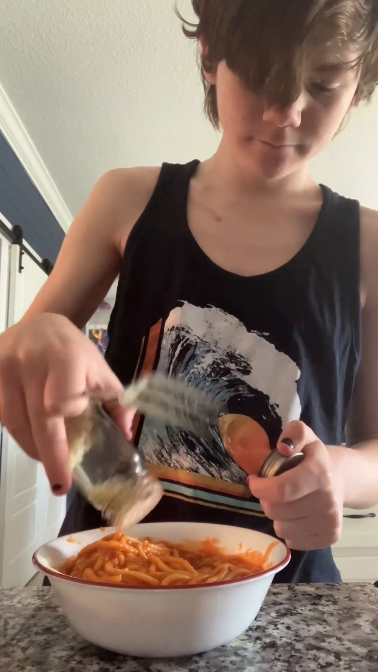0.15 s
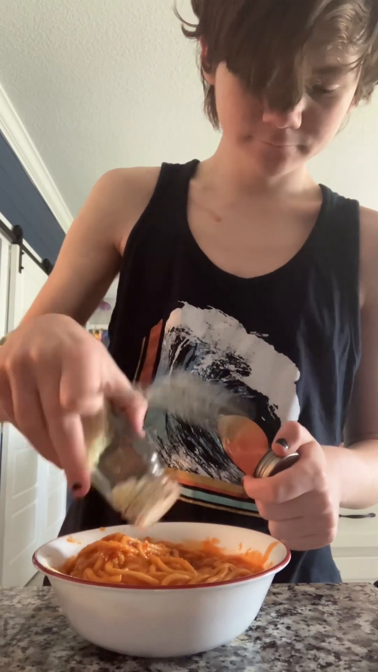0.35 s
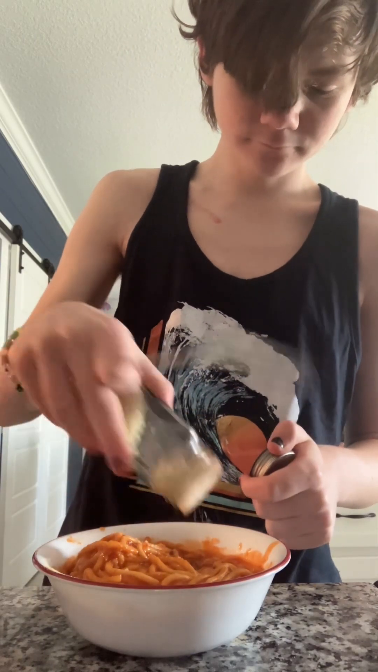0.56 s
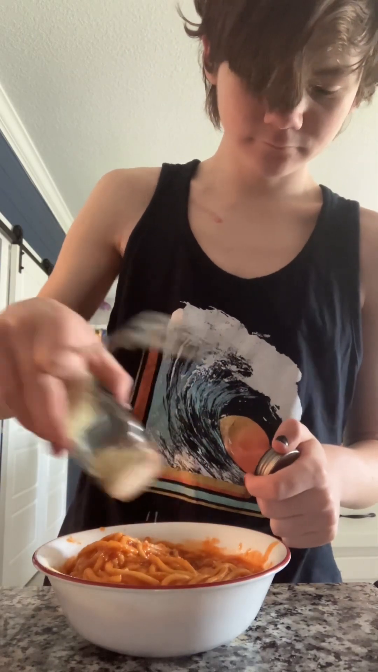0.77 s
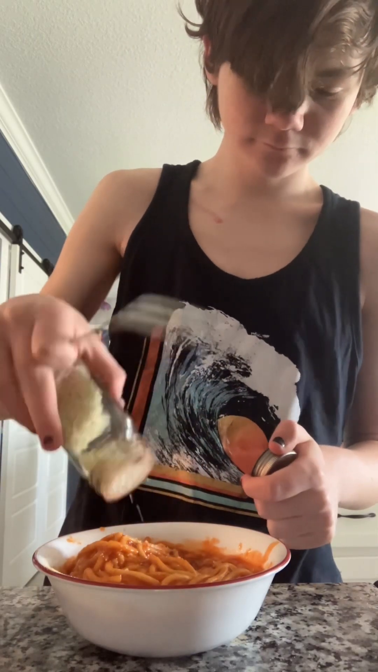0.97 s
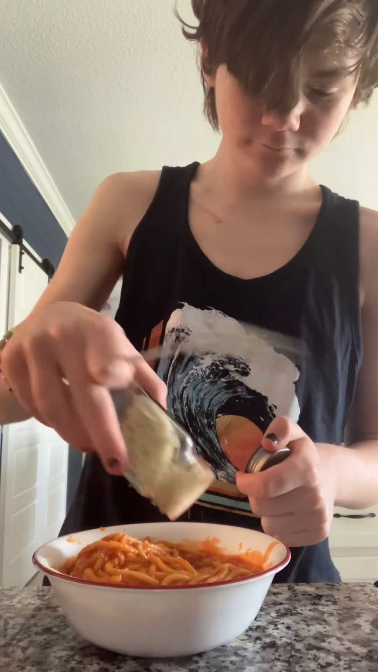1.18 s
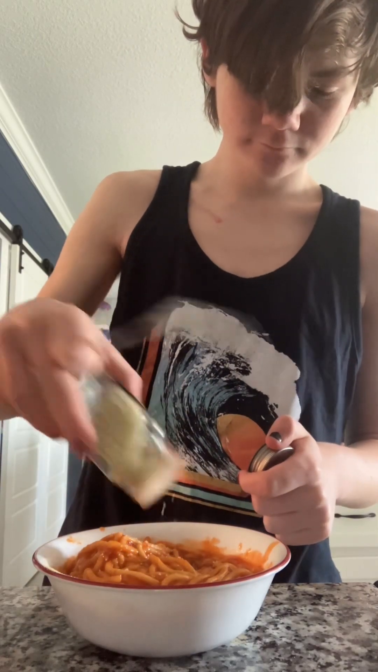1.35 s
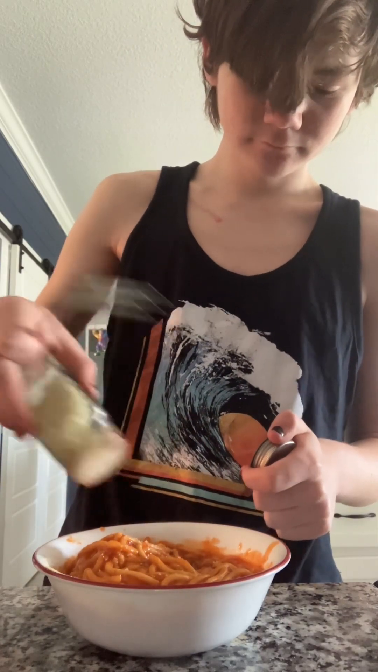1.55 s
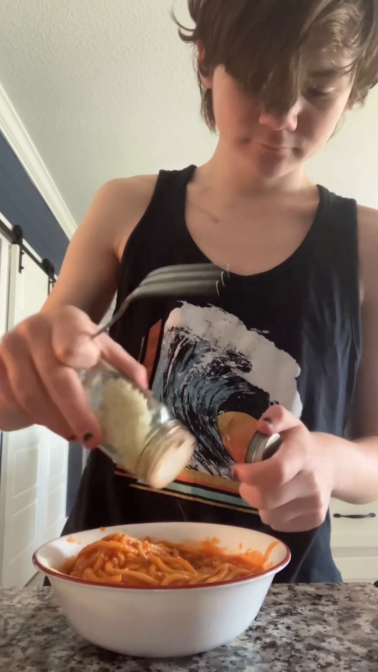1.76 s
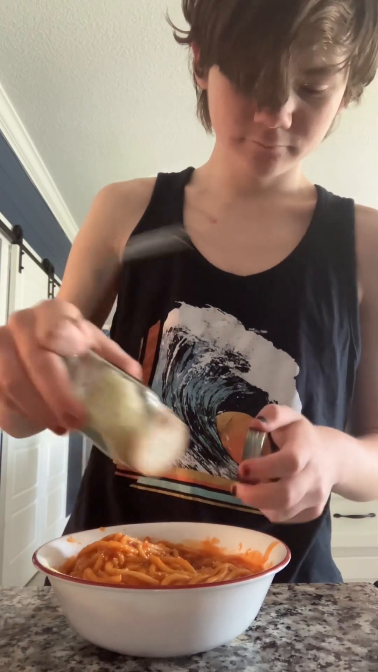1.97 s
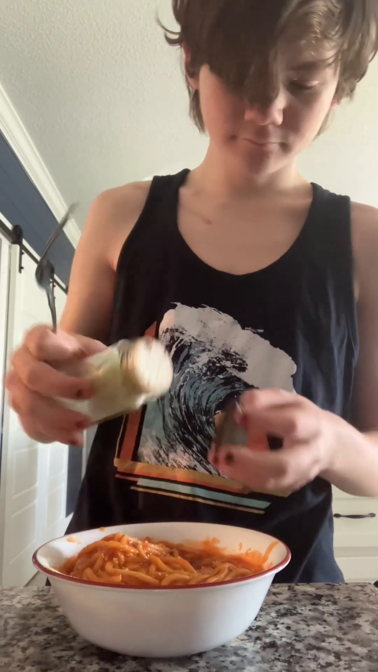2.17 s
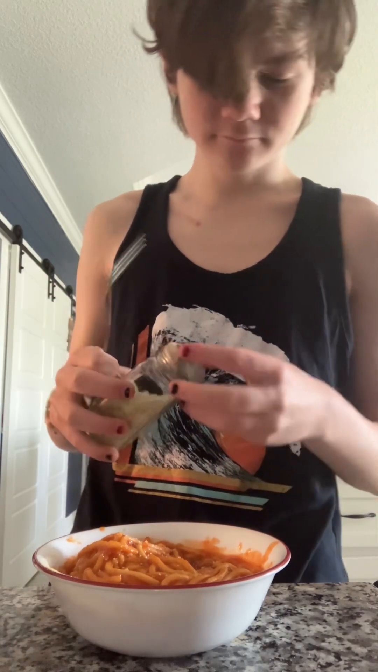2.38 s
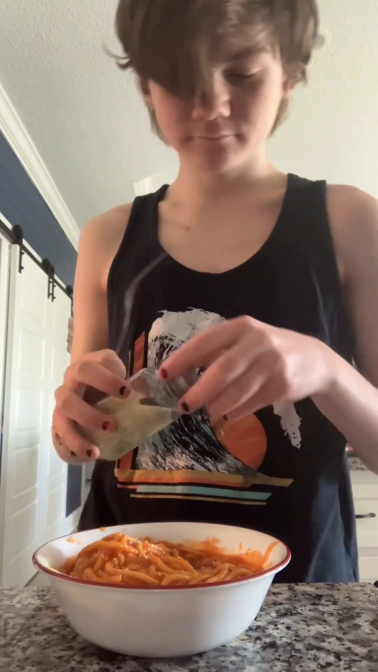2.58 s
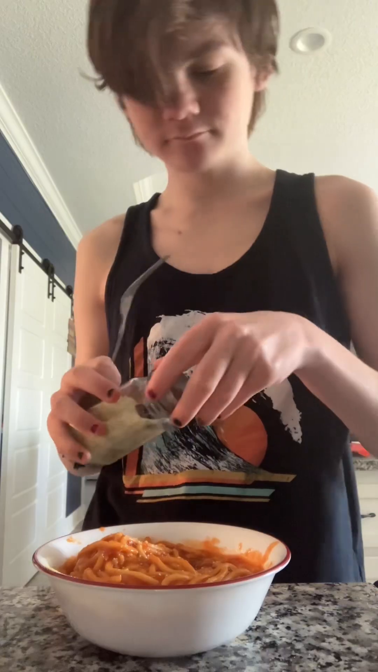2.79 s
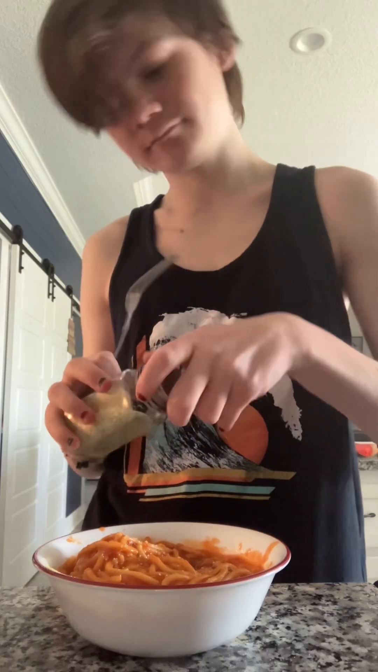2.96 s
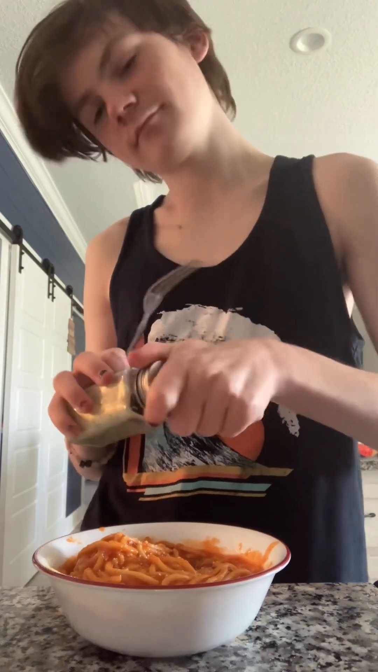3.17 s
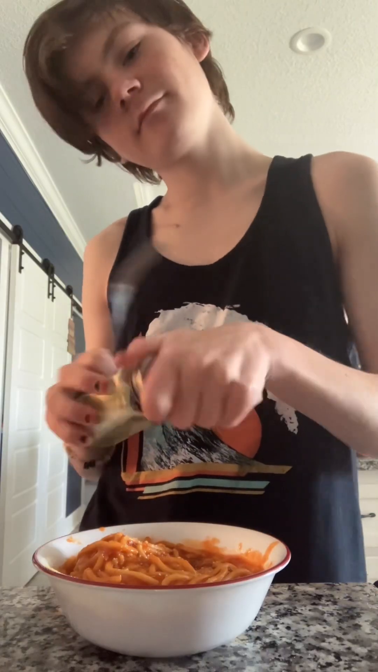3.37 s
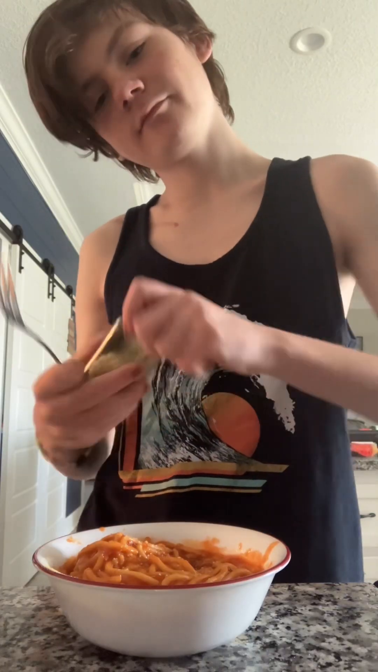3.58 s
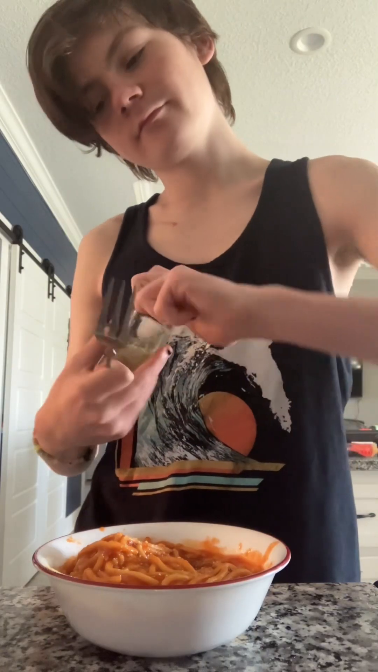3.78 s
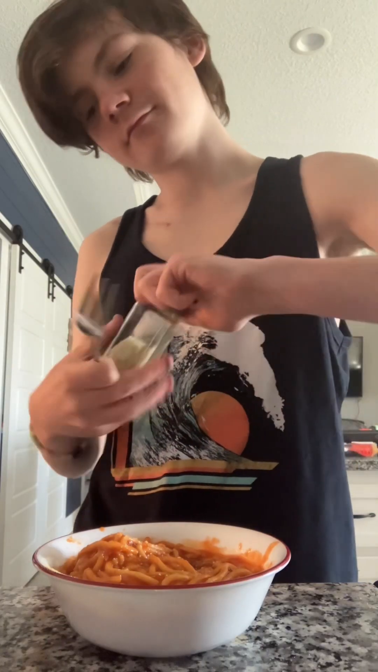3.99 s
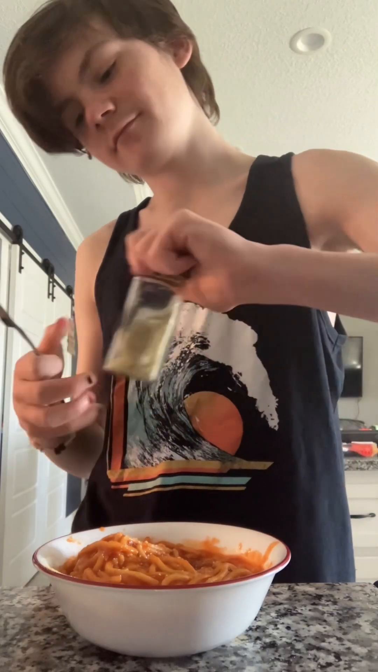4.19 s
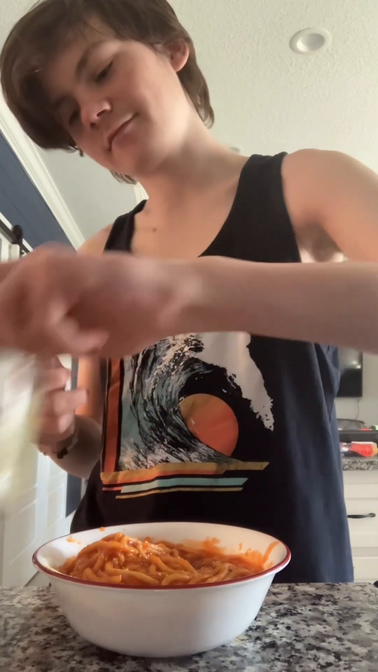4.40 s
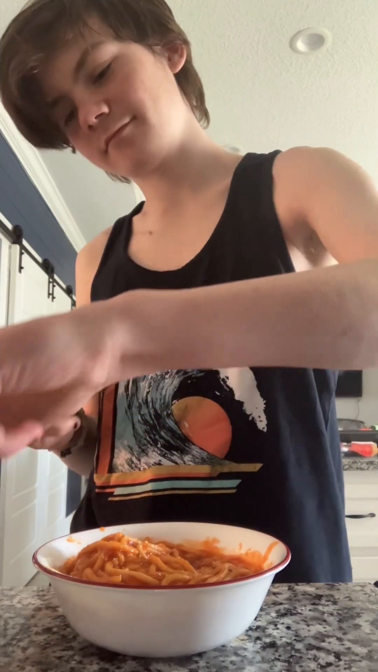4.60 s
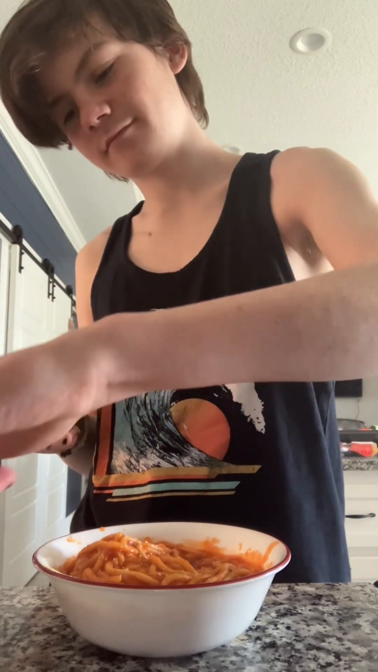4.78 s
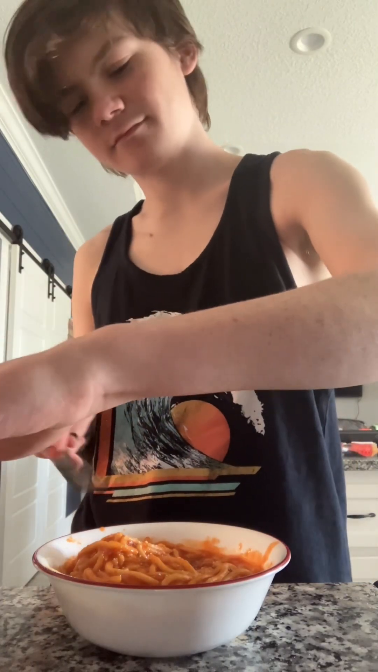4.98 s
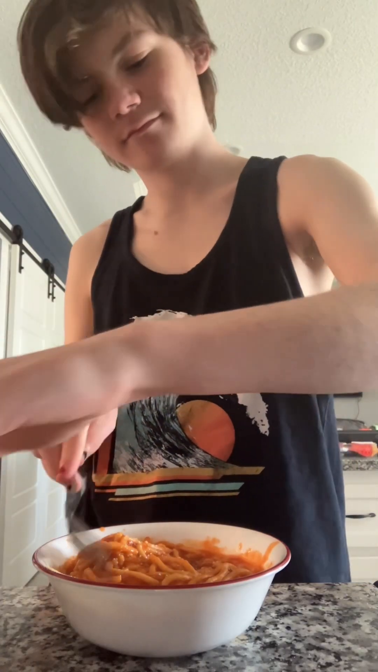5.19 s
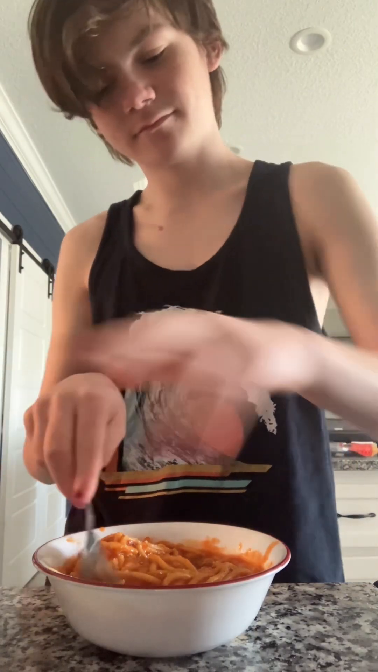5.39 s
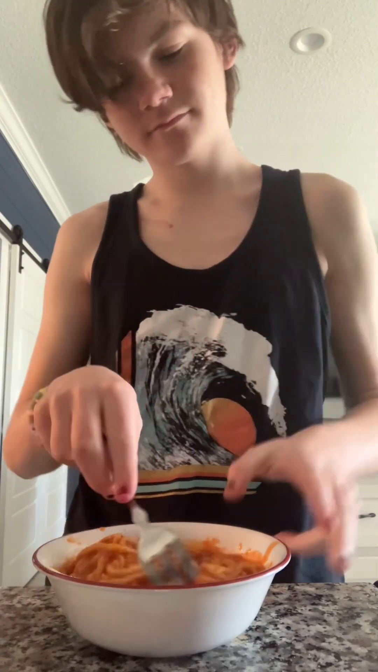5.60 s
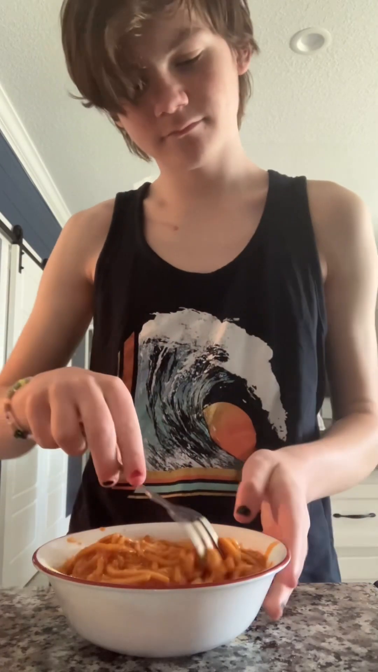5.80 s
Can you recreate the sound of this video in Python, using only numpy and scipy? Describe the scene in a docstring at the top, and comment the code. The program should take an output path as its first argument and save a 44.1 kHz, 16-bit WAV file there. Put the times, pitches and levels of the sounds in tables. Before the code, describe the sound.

Quick gritty shaker swishes and glassy clinks give way to a capping clatter, rasping twist, set-down knock, and faint fork tap in a bowl.

```python
"""Dry grains, shaken by hand in a glass jar over a bowl, are dense random impacts that also ring the glass.
The fork held in the hand clinks on the jar as decaying modes; a metal cap drops on, rocks and is screwed
tight with rasping stick-slip noise. The jar is set on a stone counter to the left, and the fork goes into
the food with a tap on the bowl and wet ticks. Kitchen reverberation, air noise and hum lie under it all."""
import sys
import numpy as np
from scipy import signal
from scipy.fft import rfft, irfft
from scipy.io import wavfile
from scipy.ndimage import uniform_filter1d

SR = 44100
rng = np.random.default_rng(int(sys.argv[2]) if len(sys.argv) > 2 else 0)


def gain_from_db(level_db):
    """Convert decibel levels to linear amplitude factors (20 dB per decade)."""
    decades = np.asarray(level_db, float) / 20
    return 10 ** decades


def unload_wav(signal):
    """Save mono or channel-first audio to the path in sys.argv[1] as 16-bit WAV at rate SR, clipped to [-1, 1]."""
    wavfile.write(
        sys.argv[1],
        SR,
        np.round(np.clip(np.atleast_2d(signal).T, -1, 1) * 32767).astype(np.int16),
    )


N = 257984


def evened(x):
    """Normalisation of power: scales to rms 1."""
    return x / np.sqrt(np.mean(x ** 2) + 1e-20)


def read(points, hz):
    """Interpolation along log frequency, as hearing spaces pitch."""
    f, value = np.transpose(points)
    return np.interp(np.log(hz + 1), np.log(f + 1), value)


def along(points):
    """Amplitude envelope: gain along a curve of (time [s], level [dB]), -120 dB outside it."""
    s, db = np.transpose(points)[:2]
    return gain_from_db(np.interp(np.arange(N) / SR, s, db, -120, -120))


def swell(s, db, rise_ms, fall_ms, shape=1.3):
    """Rise and decay: peaks at db at s, 8.5 dB lower at the times given; a high shape holds, then cuts."""
    ms = 1000 * (np.arange(N) / SR - s)
    return gain_from_db(db - 8.5 * abs(ms / np.where(ms < 0, rise_ms, fall_ms)) ** shape)


def add(mix, s, sound):
    """Superposition: mixes a sound in at time s."""
    part = mix[round(s * SR):][:len(sound)]
    part += sound[:len(part)]


def coloured(x, points):
    """Spectral shaping: multiplies the spectrum of x by a curve, at rms 1."""
    gain = gain_from_db(read(points, np.fft.rfftfreq(len(x), 1 / SR)))
    return evened(irfft(rfft(x) * gain, len(x)))


def resonate(x, hz, width):
    """Resonance by heterodyning: shifts hz (fixed or gliding) to zero, smooths, and shifts back at gain 1."""
    turn = np.exp(2j * np.pi * np.cumsum(hz * np.ones(len(x))) / SR)
    r = np.exp(-np.pi * width / SR)
    return 2 * (turn * signal.lfilter([1 - r], [1, -r], x / turn)).real


def patter(per_s, spread_db):
    """Poisson-like shot noise: impacts of either sign, their sizes exponentially distributed in dB."""
    size = gain_from_db(spread_db * np.minimum(rng.exponential(1, N), 4)) * rng.choice([-1., 1.], N)
    return size * (rng.random(N) < per_s / SR)


def ringing(x, modes, shorter):
    """Modal response by convolution: many small impacts ring modes whose t60 is scaled by shorter."""
    t = np.arange(3000) / SR
    body = sum(gain_from_db(db - 60 * t / (t60 * shorter)) * np.sin(2 * np.pi * hz * t) for hz, db, t60 in modes)
    onset = np.sin(np.pi / 2 * np.minimum(t / 0.0006, 1)) ** 2
    return evened(signal.oaconvolve(x, body * onset)[:N])


def patchy(x, patch_db):
    """Random modulation: patches about 17 ms long and 1.4 kHz wide grow louder or softer."""
    z = signal.stft(x, nperseg=256, noverlap=192)[2]
    patches = uniform_filter1d(rng.standard_normal(z.T.shape), size=12, axis=0)
    patches = uniform_filter1d(patches, size=8, axis=1)
    gusts = uniform_filter1d(rng.standard_normal(z.shape[1]), size=6)  # all bands at once
    field_db = patch_db * (evened(patches).T + 0.25 * evened(gusts))
    return evened(signal.istft(z * gain_from_db(field_db), nperseg=256, noverlap=192)[1][:N])


def blows(rows, modes, spot_db, crack_db, crack_s, rise_s, split, tick_db, slope_db=0):
    """Modal impact: damped modes as beating pairs, weighted by spot_db near the focus, with crack and tick."""
    SPOT_MID_HZ = 5800  # focus frequency at which slope_db per octave adds nothing
    SNAP_DB, SNAP_MS = 4.5, 0.5  # the first instant is louder, while the striker still drives it
    out, t = np.zeros(N), np.arange(9000) / SR
    hz, db, t60 = np.transpose(modes)[:, :, None]
    for s, peak_db, spot_hz, damping in rows:
        focus_db = spot_db + slope_db * np.log2(spot_hz / SPOT_MID_HZ)
        level_db = db + focus_db * np.exp(-(np.log(hz / spot_hz) / .2) ** 2)
        life = t60 * np.clip(1 - damping, .05, 1)
        phase, detune = rng.random((len(hz), 2)).T[:, :, None]
        twin_hz = hz * (1 + split * (detune - .5))
        pair = np.sin(2 * np.pi * (hz * t + phase)) + np.sin(2 * np.pi * (twin_hz * t + phase))
        ring = (gain_from_db(level_db - 60 * t / life) * pair).sum(0)
        # the crack leans to the modes it wakes and fades below the lowest
        colour = np.c_[hz, level_db + 4 * np.log10(life)]
        colour = np.r_[[colour[0] * [.4, 1] - [0, 30]], colour]
        crack = coloured(rng.standard_normal(len(t)), colour)
        ring = ring / abs(ring).max() + gain_from_db(crack_db - 60 * t / crack_s) * crack
        # differencing noise twice makes the tick bright
        ring += gain_from_db(tick_db - 60 * t / 0.038) * np.diff(rng.standard_normal(len(t) + 2), 2)
        ring *= np.sin(np.pi / 2 * np.minimum(t / rise_s, 1)) ** 2
        ring *= gain_from_db(SNAP_DB * np.exp(-1000 * t / SNAP_MS))
        add(out, s, gain_from_db(peak_db) * ring / abs(ring).max())
    return out


# spectrum of the grain impacts: (frequency [Hz], relative density [dB per Hz])
GRAIN_SPECTRUM = [(590, -72.5), (1000, -33), (2140, -19), (3160, -20), (4590, -9), (8970, -3), (10400, 2.5),
                  (11900, -2.5), (15400, 3.5), (15900, -17), (16500, -30.5)]
# modes that sliding grains wake in the loosely held jar: (frequency [Hz], level [dB], t60 before scaling [s])
LOOSE_JAR_MODES = [(4550, -9, .012), (7600, 0, .012), (10500, 2, .004), (13900, 4, .0025)]
# each shake throws the grains at the mouth of the jar, then they slide back:
# (throw time [s], throw level [dB], return time [s], return level [dB])
SHAKES = [(-0.07, -42, 0.014, -44), (0.108, -43.5, 0.186, -44), (0.287, -42, 0.37, -42),
          (0.485, -44, 0.553, -44.5), (0.654, -42.5, 0.73, -44.5), (0.855, -45, 0.936, -41.5),
          (1.043, -41.5, 1.123, -44.5), (1.25, -49.5, 1.319, -48), (1.438, -46.5, 1.511, -46.5),
          (1.627, -44, 1.718, -43.5), (1.829, -44.5, 1.891, -44)]


def grains():
    """Granular impact noise: dense impacts swell with each throw and return; part of them rings the glass."""
    THROW_RISE_MS, THROW_FALL_MS, RETURN_RISE_MS, RETURN_FALL_MS = 23.8, 16.4, 44.4, 30.6
    power = np.zeros(N)
    for throw_s, throw_db, return_s, return_db in SHAKES:
        power += swell(throw_s, throw_db, THROW_RISE_MS, THROW_FALL_MS) ** 2
        power += swell(return_s, return_db, RETURN_RISE_MS, RETURN_FALL_MS, shape=1.24) ** 2
    rain = patter(per_s=5000, spread_db=4.5)
    texture = coloured(rain, GRAIN_SPECTRUM) + gain_from_db(-16) * ringing(rain, LOOSE_JAR_MODES, 0.74)
    return np.sqrt(power) * patchy(texture, patch_db=2.5)


# grains slip along the tilted jar:
# (time [s], level [dB], rise [ms], fall [ms], weight of ringing against 0.5 of sliding [ratio])
TILTS = [(1.985, -55, 23, 100, .6), (2.352, -43.5, 40, 41, 0.44), (4.494, -52, 32.3, 36, 1),
         (4.6, -58.5, 50, 30, 0.17)]


def tilted_grains(glass):
    """Granular flow: sparser grain impacts slide along the jar and mix with its ringing."""
    slide = coloured(patter(per_s=3300, spread_db=5.5), GRAIN_SPECTRUM)
    return sum(swell(*row) * patchy(ring * glass + .5 * slide, patch_db=3.0) for *row, ring in TILTS)


# modes of the glass jar: (frequency [Hz], level [dB], undamped t60 [s])
JAR_MODES = [(1500, -26, .03), (2300, -24, .03), (3880, -5, .025), (4500, -10, .035), (5430, -8, .045),
             (7200, 0, .025), (7680, -6, .06), (8200, -6, .025), (9200, -10, .05), (10300, -9, .03),
             (11600, -9, .03), (12560, -21, .15), (14200, -18, .12), (15200, -4, .008)]
# metal on the glass:
# (time [s], peak level [dB], frequency favoured by the spot struck [Hz], damping by the grip [0-1])
CLINKS = [(0.0458, -32, 5460, 0.95), (0.0538, -24.5, 4000, 0.14), (0.2333, -29.5, 4330, 0),
          (0.269, -36, 8500, 0.6), (0.4191, -22.5, 5050, 0), (0.588, -34, 3880, 0),
          (0.8406, -33, 10500, 0.1), (0.9064, -36.5, 8600, 0.2), (0.9783, -31, 13130, 0.4),
          (1.0425, -35, 11900, 0.5), (1.5535, -19.5, 6700, 0), (1.7636, -17.5, 6570, 0),
          (1.945, -25.5, 9900, 0), (1.9519, -10, 7630, 0.26), (2.2087, -31.5, 4700, 0),
          (2.504, -14, 8500, 0.5), (2.5595, -16.5, 8530, 0.71), (2.7915, -44, 7140, 0.43),
          (3.1557, -15, 9000, 0.67), (3.1679, -13, 4700, 0.7), (3.6161, -9, 13560, 0.28),
          (3.6224, -14, 5540, 0.08), (3.702, -19, 4540, 0), (3.899, -44.5, 11080, 0.7),
          (4.758, -40, 10540, 0.6)]


def clinks():
    """Modal excitation by position: metal on glass favours modes near the spot, higher spots more."""
    return blows(CLINKS, JAR_MODES, spot_db=9, crack_db=-7.5, crack_s=0.012, rise_s=0.0009,
                 tick_db=-18.5, slope_db=6, split=.06)


# modes of the metal cap and the air it shuts in: (frequency [Hz], level [dB], t60 before damping [s])
CAP_MODES = [(1735, -21, 0.026), (3044, -1.5, 0.026), (3666, -13.5, 0.039), (4204, -3.5, 0.024),
             (5674, -12, 0.014), (6130, 5, 0.011), (8127, -4, 0.042), (9000, -9, 0.016),
             (12050, -11.5, 0.037)]
# the cap drops on the rim: (time [s], peak level [dB], favoured frequency [Hz], damping [0-1])
SEATS = [(2.366, -2.5, 4118, 0)]


def cap_drop():
    """Modal impact: the falling metal cap rings as it meets the rim."""
    return blows(SEATS, CAP_MODES, spot_db=3.5, crack_db=-8.0, crack_s=0.017, rise_s=0.0021,
                 split=0.017, tick_db=-18.5)


# the cap rocks: (time [s], peak level [dB], favoured frequency [Hz], damping [0-1])
ROCKS = [(2.532, -36.5, 1735, 0.1), (2.5606, -27.5, 1735, 0), (2.792, -54.5, 1735, 0.3)]


def cap_rocks():
    """Cavity resonance: the rocking cap sounds the air it shuts in, strongly favouring one mode."""
    return blows(ROCKS, CAP_MODES, spot_db=35, crack_db=-17, crack_s=0.063, rise_s=0.0041,
                 split=0.039, tick_db=-42.0)


# the dropped cap chatters on the rim: (time [s], level [dB], rise [ms], fall [ms])
CHATTER = [(2.384, -45.5, 5.7, 129), (2.498, -48.5, 8.35, 45), (3.3, -61.5, 45, 130)]


def cap_chatter(rasp):
    """Repeated contact: random small impacts ring the cap while it rasps on the rim."""
    rattle = ringing(patter(per_s=1200, spread_db=-1.5), CAP_MODES, 0.46)
    return sum(swell(*row) for row in CHATTER) * patchy(rattle + .6 * rasp, patch_db=3.0)


# spectrum of rubbing slips: (frequency [Hz], relative density [dB per Hz])
RASP_SPECTRUM = [(1180, -37), (2000, -22.5), (3520, -13), (5190, -16), (9980, -11), (14100, -14),
                 (15900, -12), (16500, -34.5)]


def rasping(slips):
    """Friction noise: fine slips rasp and stir two broad resonances of the air under the cap."""
    air_body = evened(resonate(slips, 1700, 440) + gain_from_db(-1.0) * resonate(slips, 520, 290))
    return patchy(coloured(slips, RASP_SPECTRUM) + gain_from_db(-13.0) * air_body, patch_db=3.0)


# cap and fingers scuff the glass: (time [s], rasp level [dB], fall [ms])
SCUFFS = [(2.213, -56.5, 43), (2.516, -48.5, 40), (3.04, -44.5, 14.5), (3.077, -53, 16), (3.092, -49.5, 21),
          (3.113, -49, 23.4), (3.142, -47, 10), (3.15, -36, 27), (3.22, -46, 38)]


def scuffs(rasp, glass):
    """Sliding friction: short strokes with a fast onset rasp and faintly ring the free glass."""
    RISE_MS, RING_SHARE = 1.1, 0.071
    strokes = sum(swell(s, db, RISE_MS, fall_ms, shape=2.225) for s, db, fall_ms in SCUFFS)
    return strokes * (rasp + RING_SHARE * glass)


# the cap is screwed tight: (time [s], level [dB])
TWIST = [(3.4, -66), (3.44, -59), (3.449, -38), (3.52, -47.5), (3.575, -40), (3.61, -45.5), (3.69, -49.5),
         (3.76, -61), (3.92, -72)]


def twist(rasp):
    """Sustained friction: the rasp follows the turning of the cap."""
    return along(TWIST) * rasp


# one table a turn of the cap's thread: (time [s], frequency [Hz], level [dB])
WHISTLES = [
    [(3.445, 3014, -61), (3.56, 3660, -57), (3.585, 3900, -51), (3.61, 3960, -53)],
    [(4.012, 4550, -77), (4.04, 3750, -66.5), (4.065, 3500, -78)],
]


def thread_whistles(slips):
    """Friction-driven resonance: slips in the thread excite a narrow band of gliding pitch."""
    out = np.zeros(N)
    for rows in WHISTLES:
        s, hz, db = np.transpose(rows)
        glide_hz = np.interp(np.arange(N) / SR, s, hz)
        whistle = resonate(resonate(slips, glide_hz, 330), glide_hz, 330)
        out += along(np.c_[s, db]) * evened(whistle)
    return out


# the hand shifts its grip: (time [s], level [dB], rise [ms], fall [ms])
REGRIPS = [(0.011, -58, 7.9, 33), (1.025, -64.5, 13, 26)]


def regrips(slips):
    """Broad-band friction: slips through a wide resonance give the soft rustle of a shifting grip."""
    CENTRE_HZ, WIDTH_HZ = 1770, 1400
    rustle = resonate(resonate(slips, CENTRE_HZ, WIDTH_HZ), CENTRE_HZ, WIDTH_HZ)
    return sum(swell(*row) for row in REGRIPS) * evened(rustle)


def rubs():
    """Stick-slip: one stream of fine slips drives the rasp, the free glass, the thread and the grip."""
    slips = patter(per_s=11000, spread_db=2.0)
    rasp = rasping(slips)
    glass = ringing(slips, LOOSE_JAR_MODES, 1)
    out = scuffs(rasp, glass) + twist(rasp) + thread_whistles(slips)
    return out + tilted_grains(glass) + cap_chatter(rasp) + regrips(slips)


# a finger rubs over the jar mouth: (time [s], level [dB], frequency [Hz])
FINGER = [(2.415, -91, 485), (2.429, -58, 450), (2.479, -52.5, 555), (2.499, -46.5, 457),
          (2.518, -49.5, 442), (2.54, -48.5, 451), (2.562, -49, 408)]


def finger():
    """Stick-slip excitation: skin slips unevenly and excites a low hollow resonance."""
    s, db, hz = np.transpose(FINGER)
    hz = np.interp(np.arange(N) / SR, s, hz)
    tone = resonate(resonate(patter(per_s=600, spread_db=5.5), hz, 100), hz, 250)
    return along(FINGER) * evened(tone)


# modes of the jar standing on stone: (frequency [Hz], level [dB], undamped t60 [s])
BASE_MODES = [(220, -9.5, 0.28), (592, 7, 0.089), (904, 5.5, 0.057), (1314, 6, 0.014), (1900, 6.5, 0.033),
              (2330, 2, 0.089), (2909, -3.5, 0.055), (3500, 2, 0.031), (3850, 0, 0.018), (5340, -28, 0.02),
              (7370, 0.5, 0.022), (9230, -21.5, 0.026)]
# the jar is set down and rocks: (time [s], peak level [dB], favoured frequency [Hz], damping [0-1])
KNOCKS = [(4.8372, -7, 3850, 0.38), (4.847, -20.5, 216, 0.18), (5.0828, -26.5, 1515, 0.1),
          (5.1125, -16.5, 3270, 0.29)]


def knocks():
    """Modal impact: the jar standing on stone rings as it is set down and rocks."""
    return blows(KNOCKS, BASE_MODES, spot_db=8.0, crack_db=-13.0, crack_s=0.064, rise_s=0.0016,
                 split=0.05, tick_db=-31)


# dull pushes: (time [s], starting level before onset and panning [dB], frequency [Hz], t60 [s])
THUDS = [(2.564, -33, 208, 0.064), (3.151, -17, 466, 0.025), (3.159, -31.5, 233, 0.068),
         (3.447, -34, 243, 0.029), (4.84, -44.5, 81, 0.46), (5.08, -38, 303.6, 0.23)]


def thuds():
    """Heavily damped resonance: dull pushes of the hand through jar and counter, as decaying low noise."""
    out, t = np.zeros(N), np.arange(8000) / SR
    for s, db, hz, t60 in THUDS:
        low = evened(resonate(resonate(rng.standard_normal(len(t)), hz, hz), hz, hz))
        add(out, s, low * gain_from_db(db - 60 * t / t60) * np.minimum(t / 0.014, 1))
    return out


# modes of the ceramic bowl: (frequency [Hz], level [dB], undamped t60 [s])
BOWL_MODES = [(1140, -3, .03), (2200, -9, .02), (5900, -4, .011), (7817, -2, .011), (10600, 0, .012),
              (14200, 0, .006)]
# fork meets bowl: (time [s], peak level [dB], frequency of the weakened mode [Hz], damping [0-1])
TINE = [(5.4332, -19.5, 1140, 0)]


def tine():
    """Modal impact: the fork taps the ceramic; a negative spot_db weakens the mode at the focus."""
    return blows(TINE, BOWL_MODES, spot_db=-10.0, crack_db=-14.5, crack_s=0.0094, rise_s=0.0007,
                 tick_db=-17.0, split=.04)


# wet ticks of the food round the fork:
# (time [s], level before onset [dB], frequency [Hz], decay to 1/e [cycles])
TICKS = [(5.532, -33, 13800, 2.5), (5.581, -31.5, 9640, 2.5), (5.69, -35.5, 14600, 1.8),
         (5.729, -37, 9000, 2.8), (5.735, -41, 13200, 3.8), (5.81, -41.5, 11400, 3.1),
         (5.811, -46.5, 4570, 9.5)]


def ticks():
    """Damped oscillation: short bursts of a few cycles, each with a faint fizz that outlasts it."""
    out, t = np.zeros(N), np.arange(2000) / SR
    for s, db, hz, cycles in TICKS:
        pop = np.sin(2 * np.pi * hz * t) * np.exp(-t * hz / cycles)
        fizz = evened(resonate(rng.standard_normal(len(t)), hz, 1200)) * gain_from_db(-25.0 - 60 * t / 0.056)
        onset = np.sin(np.pi / 2 * np.minimum(t * hz / 2.3, 1)) ** 2
        add(out, s, gain_from_db(db) * (pop + fizz) * onset)
    return out


# decay of the room: (frequency [Hz], t60 [s])
ROOM = [(1000, 0.34), (4000, 0.073), (12000, 0.22)]
# decay of the corner by the counter: (frequency [Hz], t60 [s])
CORNER = [(600, 0.22), (1800, 0.67), (4000, 0.25), (8000, 0.44)]


def kitchen(x, room):
    """Diffuse reverberation: sparse taps of random sign, each band decaying at its own speed, treble central."""
    taps = np.zeros((2, SR))
    at = np.arange(160, SR - 20, 20) + rng.integers(0, 20, (2, (SR - 161) // 20))
    np.put_along_axis(taps, at, rng.choice([-1., 1.], at.shape), 1)
    hz, t, z = signal.stft(taps, SR, nperseg=256)
    side = z[1] * np.clip(1.5 - hz[:, None] / 4000, .05, 1.2)
    z = np.array([z[0] + side, z[0] - side])
    tail = signal.istft(z * gain_from_db(-60 * t / read(room, hz)[:, None]), SR, nperseg=256)[1]
    return signal.fftconvolve(x[None], tail / np.linalg.norm(tail[0]), axes=1)[:, :N]


# spectrum of the kitchen air: (frequency [Hz], relative density [dB per Hz])
AIR_SPECTRUM = [(24, -32.5), (40, -5), (107, -7), (341, -23), (417, -16.5), (578, -23.5), (887, -42.5),
                (1670, -27.5), (2690, -38), (13500, -45.5), (15600, -41.5), (16100, -70.5)]
# left-right likeness: (frequency [Hz], correlation [-1 to 1])
LIKENESS = [(60, -0.04), (180, 0.6), (550, -0.11), (1650, -0.88), (4970, -0.59), (15000, 0.94)]
# left-right balance: (frequency [Hz], left over right [dB])
BALANCE = [(60, -5), (950, 0), (15000, -0.5)]


def air():
    """Partly coherent noise: rumble and hiss in two correlated channels, with random patches of level."""
    LEVEL_DB = -58.5  # rms over both channels
    frames, hz = N // 512 + 5, np.fft.rfftfreq(2048, 1 / SR)
    a, b, c, d, patches = rng.standard_normal((frames, 1025, 5)).T
    patches = evened(uniform_filter1d(uniform_filter1d(patches, 12, 0), 8, 1))
    same = np.clip(read(LIKENESS, hz), -1, 1)[:, None]
    left, other = a + 1j * b, c + 1j * d
    right = same * left + np.sqrt(1 - same ** 2) * other
    tilt = gain_from_db(read(BALANCE, hz)[:, None] / 2)
    z = np.array([left * tilt, right / tilt])
    z *= gain_from_db(read(AIR_SPECTRUM, hz)[:, None] + 2.0 * patches)
    return gain_from_db(LEVEL_DB) * evened(signal.istft(z, nperseg=2048, noverlap=1536)[1][:, :N])


# hum: (frequency [Hz], rms wander [Hz], amplitude before panning [dB])
HUM = [(59.9, 2.1, -57.5)]


def hum():
    """Frequency modulation: a low sine wavers at random, stronger on the right."""
    out = np.zeros((2, N))
    for f, wander_hz, db in HUM:
        drift_hz = wander_hz * evened(uniform_filter1d(rng.standard_normal(N), 3000))
        tone = gain_from_db(db) * np.sin(2 * np.pi * np.cumsum(f + drift_hz) / SR)
        out += tone * gain_from_db(np.array([[-1.5], [1.5]]))
    return out


def scene():
    """Superposition with arrival differences: hands in front, the counter to the left, all in the kitchen."""
    front = grains() + clinks() + cap_drop() + cap_rocks() + rubs() + finger() + tine() + ticks()
    counter = knocks()
    # the left hears first, by 1 sample in front and 31 from the counter
    right = np.roll(front, shift=1) + gain_from_db(-1.5) * np.roll(counter, shift=31)
    near = np.array([front + counter, right])
    near += thuds() * gain_from_db(np.array([[-2.5], [2.5]]))  # stronger on the right
    echoes = gain_from_db(-12.5) * kitchen(front, ROOM) + gain_from_db(-17.5) * kitchen(counter, CORNER)
    return near + echoes + air() + hum()


def low_pass(x):
    """Removes everything above the highest recorded frequency."""
    return signal.sosfilt(signal.butter(12, 16830, fs=SR, output="sos"), x)


def record(dry):
    """Mid-side filtering: the deepest bass is filtered out, and the stereo image is narrowed above 6 kHz."""
    thin = signal.sosfilt(signal.butter(3, 44, "highpass", fs=SR, output="sos"), dry)
    full_side = (thin[0] - thin[1]) / 2
    side = signal.sosfiltfilt(signal.butter(4, 6000, fs=SR, output="sos"), full_side)
    side += gain_from_db(-27.0) * (full_side - side)  # a trace of width stays in the treble
    mix = thin.mean(0) + np.array([side, -side])
    return low_pass(mix)


dry = scene()
out = record(dry)
unload_wav(out)
```